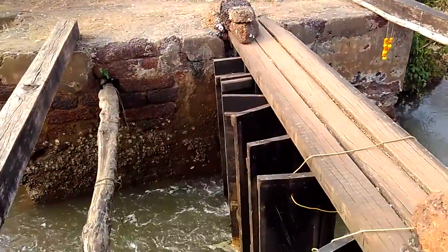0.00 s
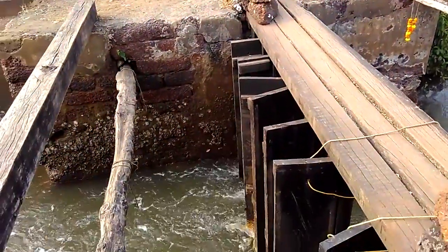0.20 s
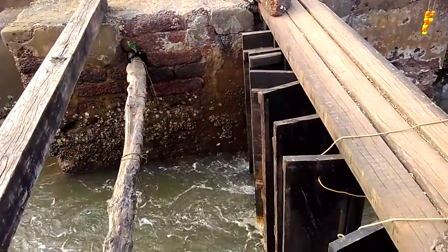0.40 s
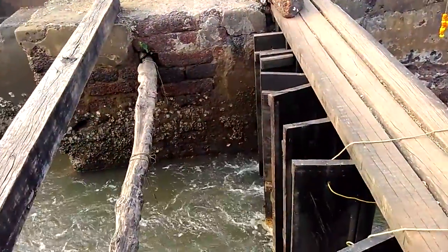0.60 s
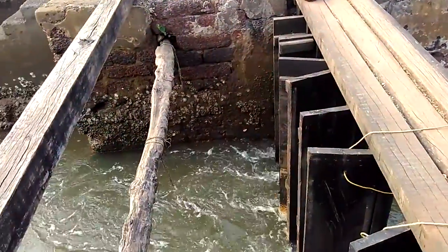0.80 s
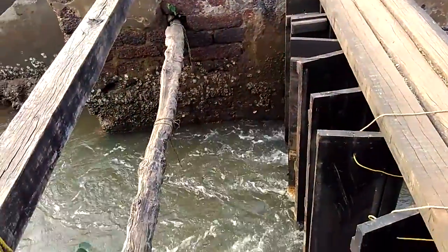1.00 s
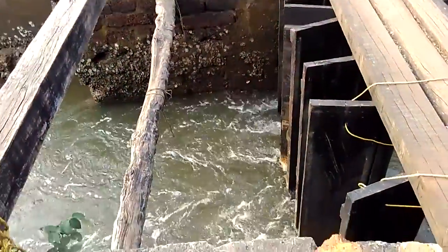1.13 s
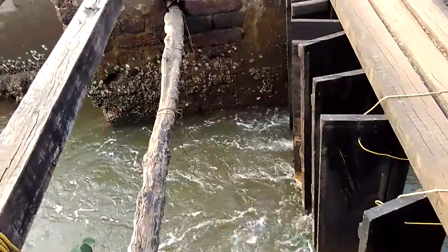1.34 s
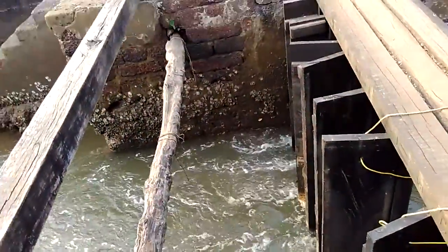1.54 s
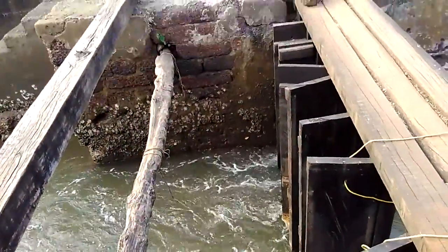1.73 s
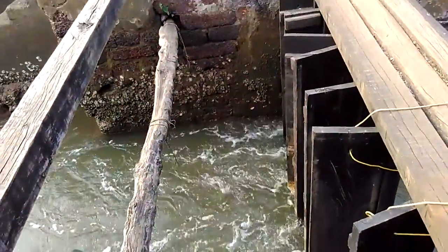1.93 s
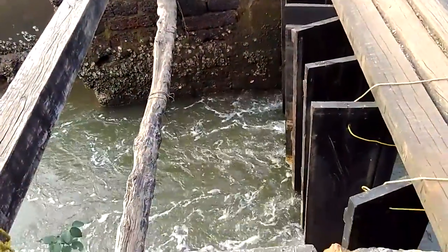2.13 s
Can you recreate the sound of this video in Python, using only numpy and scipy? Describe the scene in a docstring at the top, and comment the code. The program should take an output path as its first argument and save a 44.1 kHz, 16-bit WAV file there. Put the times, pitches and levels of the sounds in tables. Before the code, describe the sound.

Water rushes steadily through a small wooden sluice between brick walls, with spray and gurgles; soft low thumps buffet the handheld microphone, then one sharp close click trails into a short rub. Outdoors.

```python
"""Stream water rushes through the gaps of a small wooden sluice: shaped noise in drifting patches.
Spits of spray are noise bursts over a fizz of tiny bubbles; gurgles are wobbling sines that ring between
brick walls. Low thumps, swinging pulses of air, buffet the hand-held microphone, mostly its left port,
over a faint wind rumble. Once something clicks right beside that port (snaps of noise, ringing casing)
and trails off in a short rub of fading noise."""
import sys
import numpy as np
from scipy import signal
from scipy.fft import rfft, irfft
from scipy.io import wavfile
from scipy.ndimage import uniform_filter1d

SR = 44100
rng = np.random.default_rng(int(sys.argv[2]) if len(sys.argv) > 2 else 0)


def inscribe(sig):
    """Save sig as 16-bit PCM at rate SR to the path in sys.argv[1].

    A 1-D sig is mono; a 2-D sig holds one channel per row.
    Samples are clipped to [-1, 1] before scaling.
    """
    pcm = np.round(np.clip(np.atleast_2d(sig).T, -1, 1) * 32767)
    wavfile.write(sys.argv[1], SR, pcm.astype(np.int16))


N = 97020
T = np.arange(N) / SR
FFT_HZ = np.fft.rfftfreq(N, 1 / SR)


def amp(db):
    """Gain from dB."""
    return 10 ** (np.asarray(db) / 20)


def unit(x):
    """Scale to rms 1."""
    return x / np.sqrt(np.mean(x ** 2) + 1e-20)


def read(table, hz, column=1):
    """Interpolate a table column on a log-frequency axis."""
    rows = np.array(table, float)
    return np.interp(np.log(hz + 1), np.log(rows[:, 0] + 1), rows[:, column])


def curve(points):
    """Gain per sample from (t/s, level/dB) points."""
    return amp(np.interp(T, *np.transpose(points)))


def tint(x, table, column=1):
    """Filter a sound by a table's dB response."""
    return irfft(rfft(x) * amp(read(table, FFT_HZ, column)), N)


def hiss(table, white):
    """Two channels of rms-1 white noise brought to a table's left and right dB/Hz."""
    return np.sqrt(SR / 2) * np.array([tint(white[0], table, 1), tint(white[1], table, 2)])


def wander(hz, slope=2):
    """Random drift of rms 1, rolling off above about hz."""
    return unit(irfft(rfft(rng.standard_normal(N)) / (1 + (FFT_HZ / hz) ** slope), N))


def burst(start_s, rise_s, hold_s, decay_s):
    """Linear attack, hold, exponential release with time constant decay_s."""
    t = T - start_s
    return np.clip(t / rise_s, 0, 1) * np.exp(-np.maximum(t - rise_s - hold_s, 0) / decay_s)


def lowpass(x, hz):
    """Steep linear-phase FIR low-pass."""
    taps = signal.firwin(401, hz, window=("kaiser", 9), fs=SR)
    return signal.oaconvolve(x, taps[None], "same", axes=1)


def bubbles(per_s, low_hz, high_hz, cycles, spread_db, count=24):
    """Swarm of small bubbles at random instants, each a short ring rising slightly in pitch; rms 1."""
    out, t = np.zeros(N), np.arange(SR // 20) / SR
    for hz in np.geomspace(low_hz, high_hz, count):
        age = t * hz / cycles
        tone = np.sin(2 * np.pi * hz * t * (1 + 0.0085 * np.minimum(age, 5)))
        ring = tone * np.exp(-age) * (1 - np.exp(-6 * age))
        hits = rng.random(N) < per_s / count / SR
        pops = hits * amp(spread_db * np.minimum(rng.exponential(1, N), 3))
        out += signal.oaconvolve(pops, ring)[:N]
    return unit(out)


# rush spectrum before gain and surge: f/Hz, left level/(dB/Hz), right level/(dB/Hz)
RUSH_SPECTRUM = [(94, -76, -74.5), (175, -79, -83.5), (330, -71.5, -70.5), (534, -76.5, -78.5),
                 (930, -74, -77), (1490, -74, -78), (1944, -74, -79.5), (3030, -86, -85.5),
                 (4300, -93.5, -86), (5700, -87.5, -87.5), (7600, -88.5, -90.5), (10030, -79, -90),
                 (11340, -80.5, -105), (12000, -86, -92.5), (14500, -92.5, -100)]
# left-right correlation of the rush, clipped to -1..1: f/Hz, correlation/1
PORT_CORRELATION = [(100, -1.07), (300, -0.79), (700, -0.79), (1500, -0.58), (3100, -0.43), (6000, -0.025),
                    (14000, -0.018)]
# slow gain of the rush: t/s, level/dB
RUSH_SURGE = [(0, 1), (.3, 2), (.7, 1.2), (1.1, -.5), (1.5, 2.5), (1.8, -1.5), (2.0, 0.6), (2.15, 2.7)]
RUSH_GAIN_DB, PATCH_RMS_DB, SWELL_RMS_DB, FLICKER_RMS_DB = -1, 2.73, 0.53, 0.6


def rush():
    """Wash of water: noise with time-frequency patches, a surge, a swell and a quick flicker."""
    frames, hz = N // 128 + 6, np.fft.rfftfreq(512, 1 / SR)
    a, b, c, d, patches = rng.standard_normal((5, frames, len(hz)))
    patches = uniform_filter1d(patches, size=14, axis=0)  # over frames
    patches = unit(uniform_filter1d(patches, size=5, axis=1))  # over bins
    correlation = np.clip(read(PORT_CORRELATION, hz), -1, 1)
    left, independent = a + 1j * b, c + 1j * d
    right = correlation * left + np.sqrt(1 - correlation ** 2) * independent
    frames_lr = np.array([left, right]) * amp(PATCH_RMS_DB * patches)
    noise = signal.istft(frames_lr.transpose(0, 2, 1), nperseg=512, noverlap=384)[1]
    white = unit(noise[:, :N])
    drift_db = SWELL_RMS_DB * wander(24) + FLICKER_RMS_DB * wander(62)
    return hiss(RUSH_SPECTRUM, white) * curve(RUSH_SURGE) * amp(RUSH_GAIN_DB + drift_db)


# spits of spray: t/s, level/dB (left), decay/s
SPRAY_SPITS = [(0.041, -31, 0.0096), (.165, -42, 0.016), (.237, -36, 0.0031), (0.727, -36, 0.0078),
               (.755, -48, .008), (0.788, -36.5, 0.023), (1.005, -32.5, 0.0021), (1.191, -32.5, 0.0042),
               (1.236, -36, 0.0035), (1.536, -26.5, 0.0032), (1.825, -40, 0.055), (2.10, -37, .025),
               (2.154, -32.5, 0.0038)]
# spray colour, relative: f/Hz, level/dB
SPRAY_COLOUR = [(800, -44), (2000, 5), (4000, -4.5), (5800, 1.5), (8000, -1), (10500, 10), (12500, -3.5),
                (14500, -12)]
FIZZ_PER_S, FIZZ_DB, SPRAY_RIGHT_DB = 500, -52.5, -8


def spray():
    """Droplets: steady fizz of tiny bubbles, plus brief noise spits where water strikes the boards."""
    spit_level = sum(amp(db) * burst(s, 0.00067, 0, decay_s) for s, db, decay_s in SPRAY_SPITS)
    sides = []
    for _ in range(2):
        fizz = unit(tint(bubbles(FIZZ_PER_S, 2470, 13600, 1.2, 2.5), SPRAY_COLOUR))
        spit_noise = unit(tint(rng.standard_normal(N), SPRAY_COLOUR))
        sides.append(amp(FIZZ_DB) * fizz + spit_level * spit_noise)
    return np.array(sides) * amp([[0], [SPRAY_RIGHT_DB]])


# gurgles and plinks of trapped air: t/s, mean f/Hz, level/dB (left, before flutter), hold/s, decay/s
AIR_GURGLES = [(.173, 483, -35.5, 0.011, 0.0098), (.222, 941, -21.5, 0.027, 0.011),
               (.223, 610, -32.5, 0.0043, 0.0047), (.236, 822, -26, 0.013, 0.0046),
               (0.248, 1031, -23, 0.0065, 0.0025), (0.782, 2100, -28, 0.0059, 0.0028),
               (0.7898, 2140, -16, 0.00078, 0.00056), (.7922, 2450, -16, .0007, 0.00053),
               (0.797, 2030, -24, 0.0018, 0.0033), (.807, 2130, -27, .002, 0.0036),
               (.826, 2006, -28.5, 0.0036, .005), (.869, 1950, -32, 0.0059, .004),
               (0.938, 1874, -35.5, 0.022, 0.015), (1.155, 330, -36, 0.0025, 0.0035),
               (1.19, 303, -28, 0.0023, .005), (1.193, 505, -36, .002, .005)]
GURGLE_RISE_S, GURGLE_PITCH_WOBBLE_RMS, GURGLE_FLUTTER_RMS_DB = .0006, 0.071, 1.2
BABBLE_PER_S, BABBLE_DB = 160, -46.5
GURGLE_RIGHT_DB, BABBLE_RIGHT_DB = -11, -6.5
WALLS_DB, WALLS_RIGHT_DB, WALLS_T60_S = -10.5, -24, 0.74


def gurgles():
    """Air pockets ring with wobbling pitch over a bubble babble; brick walls answer with a noise tail."""
    near = np.zeros(N)
    for s, hz, db, hold_s, decay_s in AIR_GURGLES:
        pitch_hz = hz * (1 + GURGLE_PITCH_WOBBLE_RMS * wander(300))
        turns = np.cumsum(pitch_hz * (T > s)) / SR
        level = amp(db + GURGLE_FLUTTER_RMS_DB * wander(140)) * burst(s, GURGLE_RISE_S, hold_s, decay_s)
        near += level * np.sin(2 * np.pi * turns)
    babble = amp(BABBLE_DB) * bubbles(BABBLE_PER_S, 387.4, 2326, 8, 5.4)
    tail = rng.standard_normal((2, N)) * amp(-60 * T / WALLS_T60_S) * (T > .006)
    echo = signal.fftconvolve(near[None], tail / np.linalg.norm(tail[0]), axes=1)[:, :N]
    # right port in opposite polarity
    direct = np.array([near + babble, -amp(GURGLE_RIGHT_DB) * near - amp(BABBLE_RIGHT_DB) * babble])
    return direct + amp([[WALLS_DB], [WALLS_RIGHT_DB]]) * echo


AIR_TOP_HZ = 270


def dull(x):
    """Smooth roll-off above AIR_TOP_HZ, shared by thumps and rumble."""
    return irfft(rfft(x) / (1 + (FFT_HZ / AIR_TOP_HZ) ** 8), N)


# thumps of air, t at envelope peak: t/s, envelope level/dB, f/Hz, rise/s, decay/s, right share/1 (0-1)
AIR_THUMPS = [(.012, -33.5, 35, 0.01, 0.031, 0), (0.199, -19.5, 65, .012, 0.014, 0),
              (.195, -28, 170, 0.0071, 0.0085, 0.25), (.249, -10, 141.2, 0.015, 0.012, 0),
              (.27, -9.5, 94, 0.0019, 0.01, 0.03), (.30, -28, 170.5, 0.014, 0.085, 0.13),
              (0.337, -20.5, 101, 0.0078, 0.015, 0), (0.383, -20, 32, 0.034, 0.022, 0.4),
              (.482, -17.5, 140.4, 0.0099, 0.019, 0.76), (.506, -7, 43.4, .012, 0.02, .02),
              (0.504, -16, 93.3, 0.022, 0.014, .03), (.53, -26, 191, 0.017, 0.029, 0.25),
              (0.568, -18, 75, 0.015, 0.012, 0.17), (0.629, -24, 45, 0.02, 0.012, .1),
              (0.759, -27.5, 28.5, 0.011, 0.045, 0.63), (0.884, -21, 31, .018, 0.024, 1),
              (0.964, -32, 61, 0.021, 0.012, 0.28), (1.162, -39, 200, 0.0045, .008, 0.3),
              (1.195, -35, 201, 0.0052, 0.0051, 0.34), (1.247, -20.5, 47.4, 0.0061, 0.0091, .95),
              (1.324, -15.5, 69, 0.0034, 0.024, 0), (1.373, -20, 76.6, 0.0029, .009, 0),
              (1.817, -30.5, 46, 0.0048, 0.028, 1), (2.063, -27.5, 28, 0.013, 0.041, 0)]
THUMP_ROUND_S, THUMP_ROUGH_RMS, ROUGH_REACH = 0.004, 0.64, 1.36  # reach: multiple of thump f
THUMP_SKIRT_DB, THUMP_SKIRT_HZ = -27.5, 355


def thumps():
    """Puffs of air swing the pressure at a port a few times and stir up eddies, heard as rough noise."""
    swings, stir = np.zeros((2, N)), np.zeros((2, N))
    for s, db, hz, rise_s, decay_s, right in AIR_THUMPS:
        t = T - s
        distance_s = np.hypot(t, THUMP_ROUND_S) - THUMP_ROUND_S  # rounds the peak
        shape = np.exp(-distance_s / np.where(t < 0, rise_s, decay_s))
        right = np.clip(right, 0, 1)
        push = np.outer([1 - right, right], amp(db) * shape)
        eddies = THUMP_ROUGH_RMS * wander(ROUGH_REACH * hz, slope=3.34)
        swings += push * (-np.sin(2 * np.pi * hz * t) + eddies)
        stir += push
    return dull(swings) + amp(THUMP_SKIRT_DB) * stir * wander(THUMP_SKIRT_HZ, slope=5.9)


# contacts: t/s, left snap level/dB, right snap level/dB, knock level/dB, snap decay/s
CONTACTS = [(1.3145, -46, -66, -18, .001), (1.3166, -24, -48, -10, 0.00081), (1.3185, -7, -38, -5, 0.00054),
            (1.3238, -14.5, -45, -38, 0.00035), (1.334, -11, -16.5, -44, 0.00036),
            (1.333, -19, -40, -25, 0.00042)]
# casing modes, level relative to knock: f/Hz, left level/dB, right level/dB, t60/s
CASING_MODES = [(324, -26, -6.5, 0.039), (550, -4, -23, 0.014), (710, -3.5, -12.5, 0.011),
                (940, -3, -25, 0.0084), (1160, -14, -18, 0.0052), (1500, -9.5, -20, .007)]
# snap colour, relative: f/Hz, level/dB
SNAP_COLOUR = [(1000, 2.5), (3000, -14), (4300, 0), (5800, 1.5), (7600, -7), (10800, 8.5), (12800, -14),
               (14600, -11), (15800, -35)]
SNAP_RISE_S, SNAP_HOLD_S = 0.00031, 0.00017


def click():
    """Quick contacts: each a noise snap plus a knock ringing the casing's damped modes."""
    out = np.zeros((2, N))
    for s, left_db, right_db, knock_db, decay_s in CONTACTS:
        t = np.maximum(T - s, 0)
        snap = np.array([unit(tint(rng.standard_normal(N), SNAP_COLOUR)) for _ in range(2)])
        out += amp([[left_db], [right_db]]) * snap * burst(s, SNAP_RISE_S, SNAP_HOLD_S, decay_s)
        for k, (hz, mode_left_db, mode_right_db, t60_s) in enumerate(CASING_MODES):
            ring = amp(knock_db - 60 * t / t60_s) * np.sin(2 * np.pi * hz * t)
            out += (-1) ** k * amp([[mode_left_db], [mode_right_db]]) * ring
    return out


# rub spectrum before pressure: f/Hz, left level/(dB/Hz), right level/(dB/Hz)
RUB_SPECTRUM = [(80, -61, -66), (196, -66, -72), (324, -66.5, -56.5), (470, -55.5, -72), (740, -56, -92),
                (1130, -59.5, -78), (1460, -52, -71), (2080, -73, -75), (3020, -73.5, -103),
                (4540, -69.5, -86), (5870, -65.5, -94), (7700, -70.5, -85), (10700, -60.5, -105),
                (12900, -68, -94), (14300, -74, -100)]
# rub pressure as gain: t/s, level/dB
RUB_PRESSURE = [(1.31, -56), (1.319, 3.5), (1.335, -2), (1.37, -2.5), (1.395, -8), (1.45, -9), (1.49, -15),
                (1.53, -13.5), (1.61, -23.5), (1.75, -26.5), (1.85, -48)]
RUB_SPLIT_HZ, RUB_LUMP_RMS_DB, RUB_GRAIN_RMS_DB = 2200, 2.5, 1.5


def rub():
    """Friction noise fading after the click: lumpy body below the split, finer-grained hiss above."""
    noise = hiss(RUB_SPECTRUM, rng.standard_normal((2, N))) * curve(RUB_PRESSURE)
    body = lowpass(noise, RUB_SPLIT_HZ)
    fine = noise - body
    return body * amp(RUB_LUMP_RMS_DB * wander(76)) + fine * amp(RUB_GRAIN_RMS_DB * wander(150))


# wind rumble before gain and roll-off: f/Hz, left level/(dB/Hz), right level/(dB/Hz)
RUMBLE_SPECTRUM = [(7.8, -45.5, -44), (23.1, -54.5, -53.5), (46.8, -62.5, -73), (90, -68.5, -70.5),
                   (200, -82, -100)]
# rumble gain: t/s, level/dB
WIND_LEVEL = [(0, -5), (.3, -2.5), (.6, 2), (.9, -1), (1.1, -8), (1.6, -5.5), (2.2, -5.5)]


def rumble():
    """Faint wind rumble: low noise, independent at the two ports, with a slowly moving level."""
    return dull(hiss(RUMBLE_SPECTRUM, rng.standard_normal((2, N))) * curve(WIND_LEVEL))


TREBLE_EDGE_HZ = 14400


def scene():
    """Sum of all sources; rush, spray and rub stop at the treble edge."""
    noisy = lowpass(rush() + spray() + rub(), TREBLE_EDGE_HZ)
    return noisy + gurgles() + thumps() + click() + rumble()


CEILING, CUT_HZ = .85, 16200


def record(dry):
    """Round off peaks towards the ceiling, then band-limit."""
    rounded = dry / (1 + (dry / CEILING) ** 6) ** (1 / 6)
    return lowpass(rounded, CUT_HZ)


dry = scene()
out = record(dry)
inscribe(out)
```